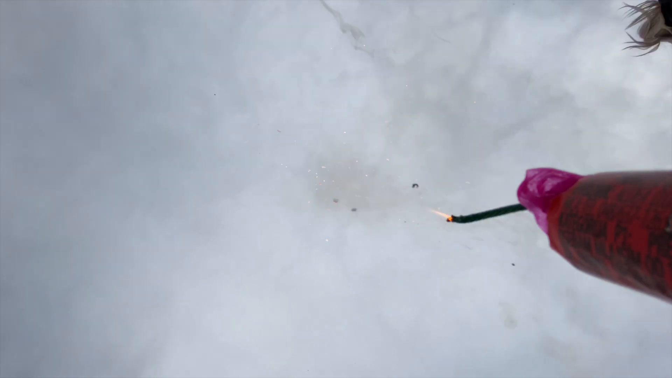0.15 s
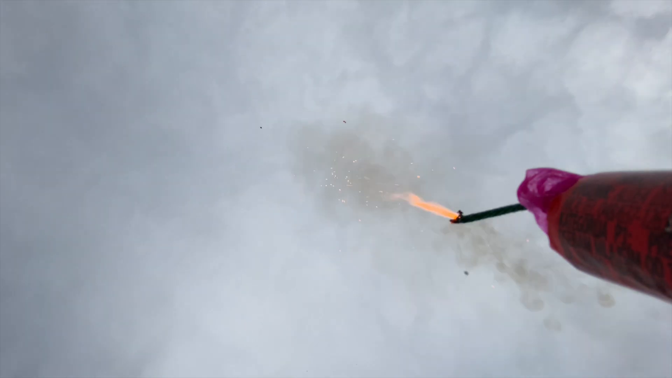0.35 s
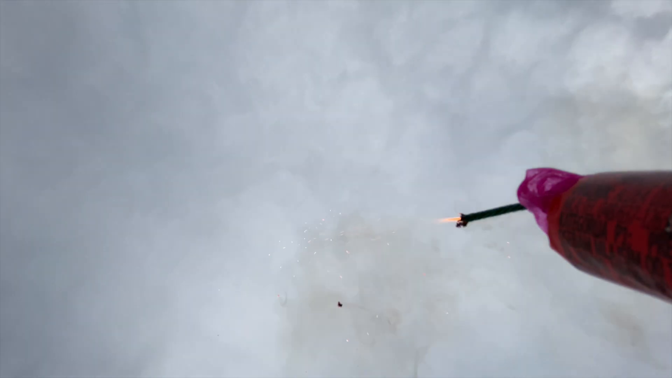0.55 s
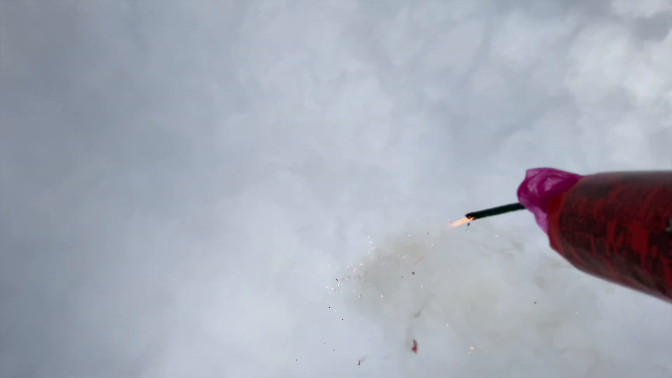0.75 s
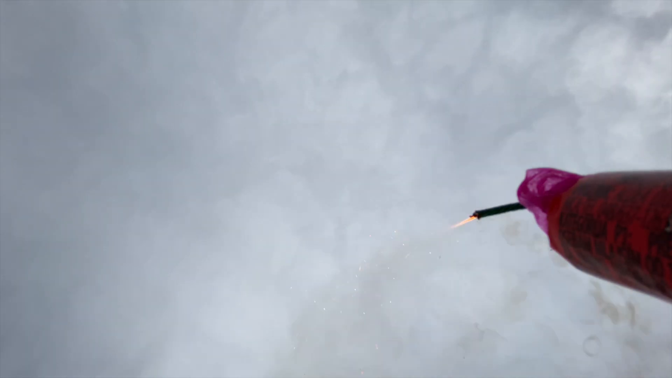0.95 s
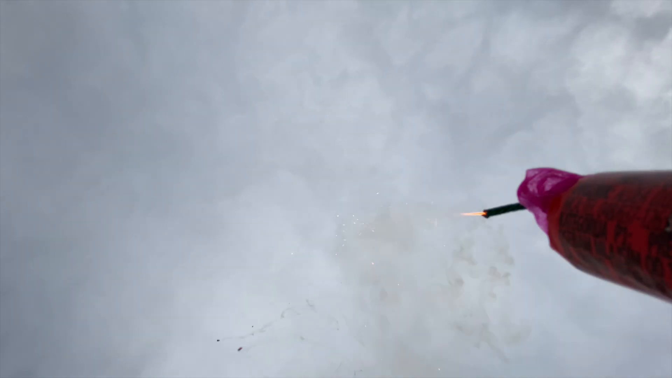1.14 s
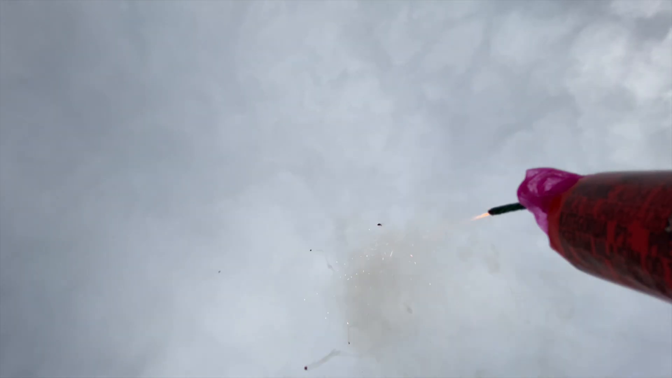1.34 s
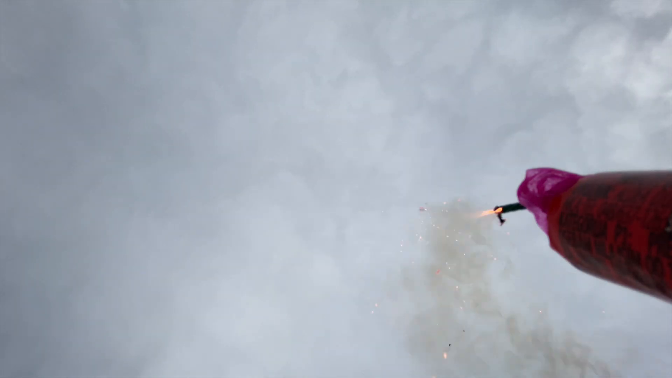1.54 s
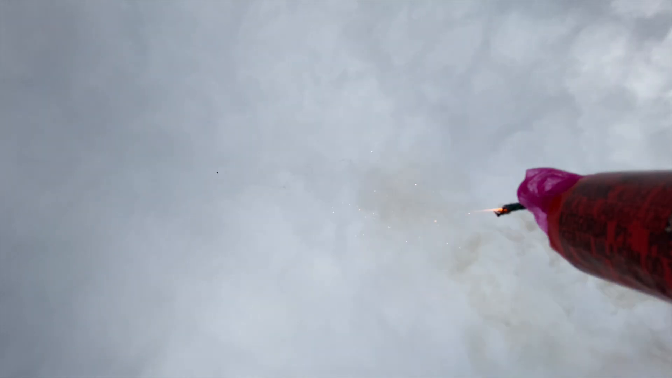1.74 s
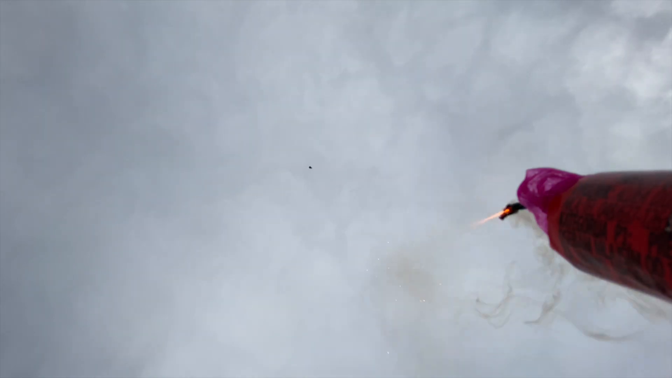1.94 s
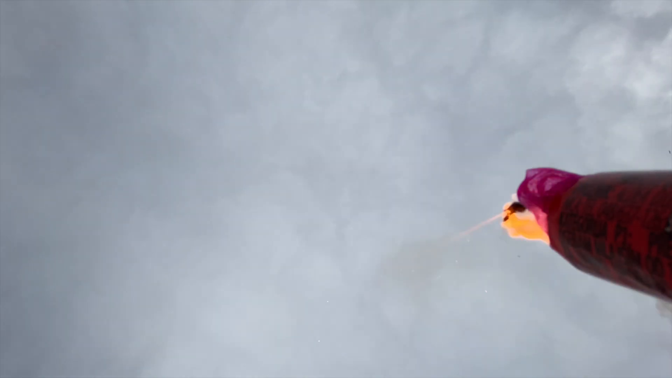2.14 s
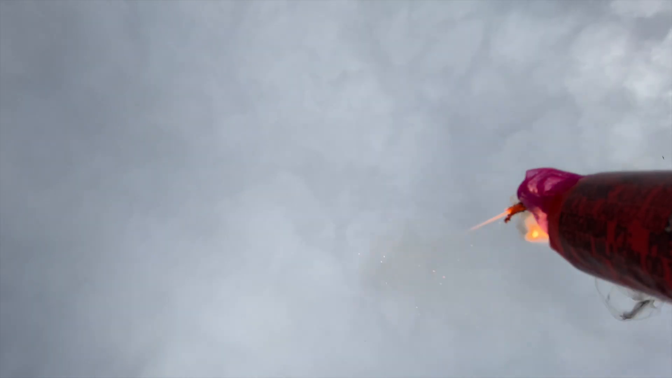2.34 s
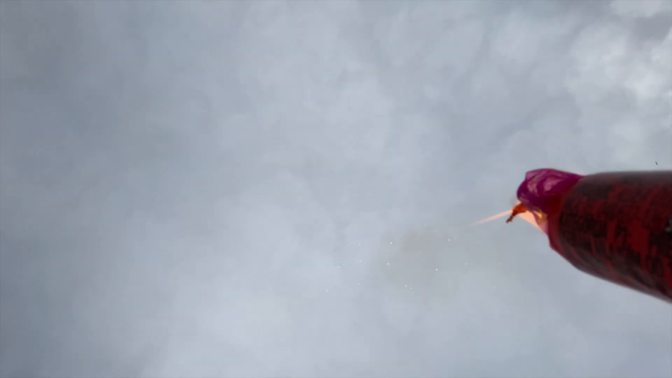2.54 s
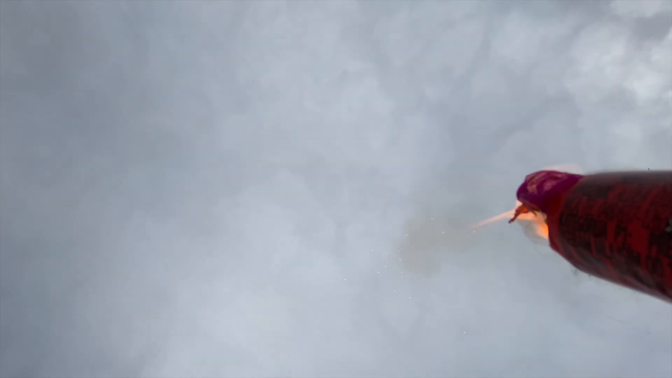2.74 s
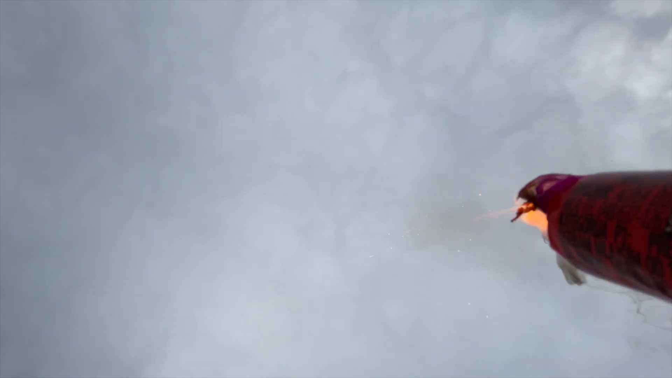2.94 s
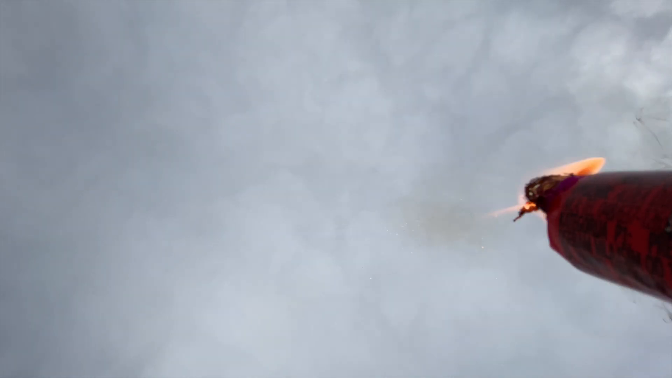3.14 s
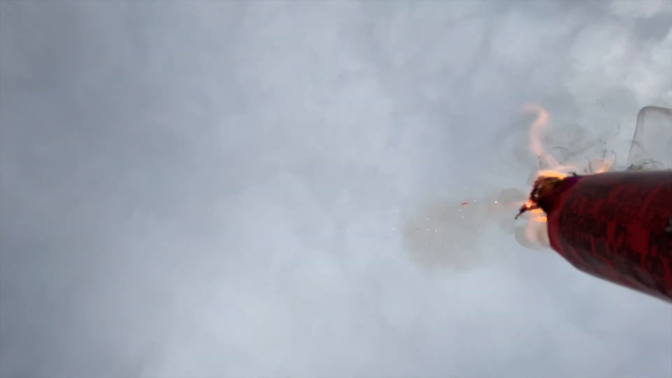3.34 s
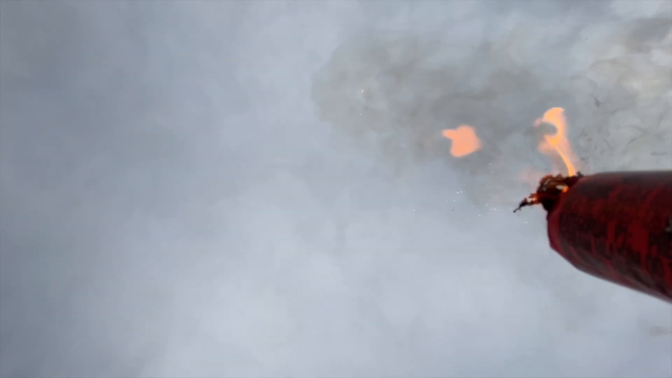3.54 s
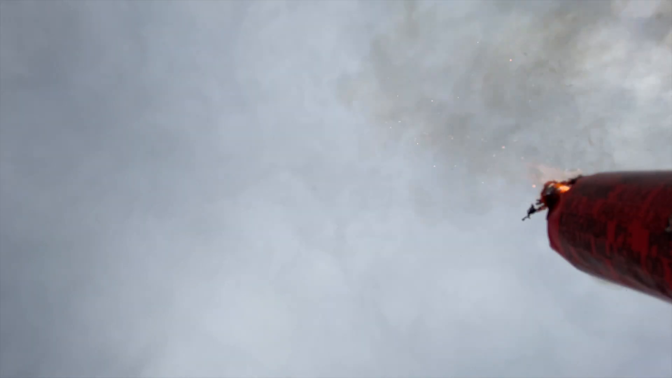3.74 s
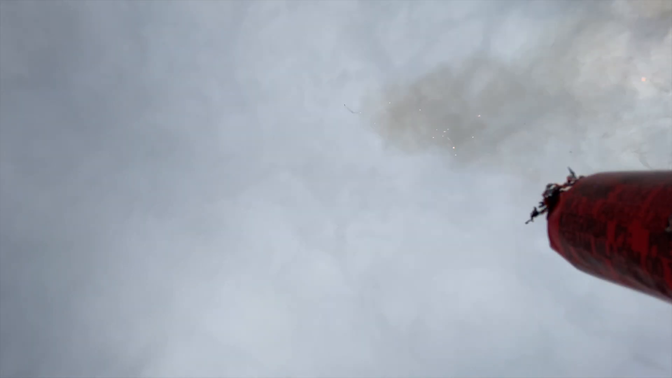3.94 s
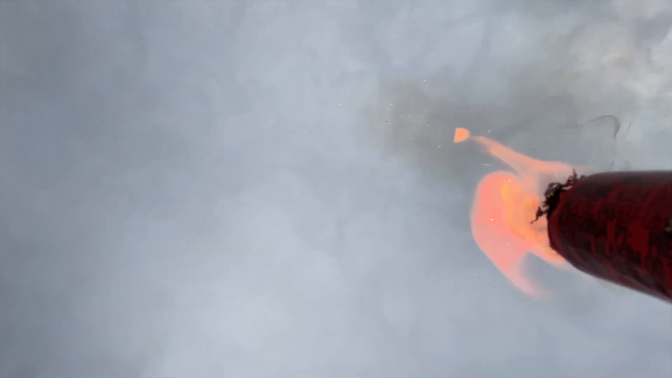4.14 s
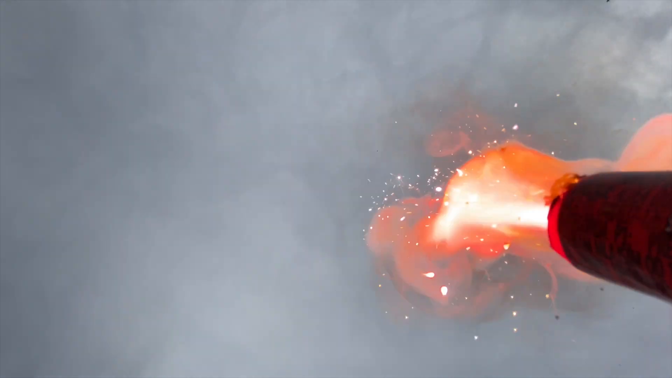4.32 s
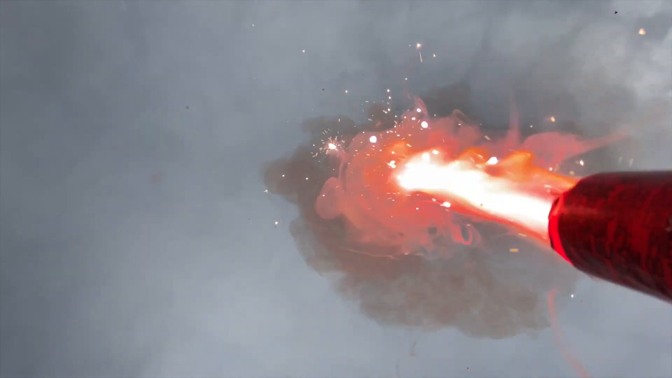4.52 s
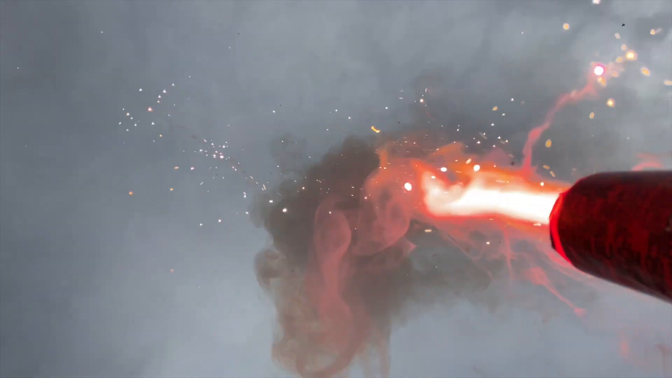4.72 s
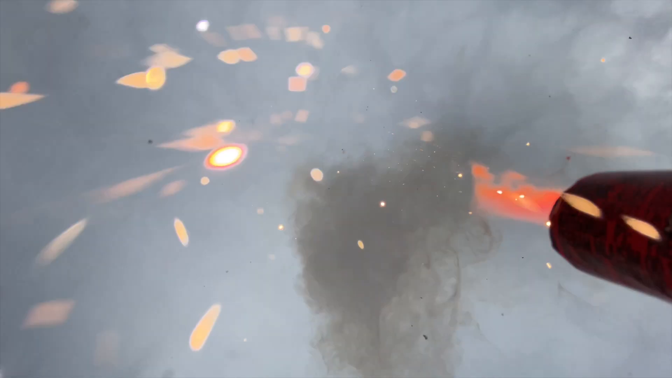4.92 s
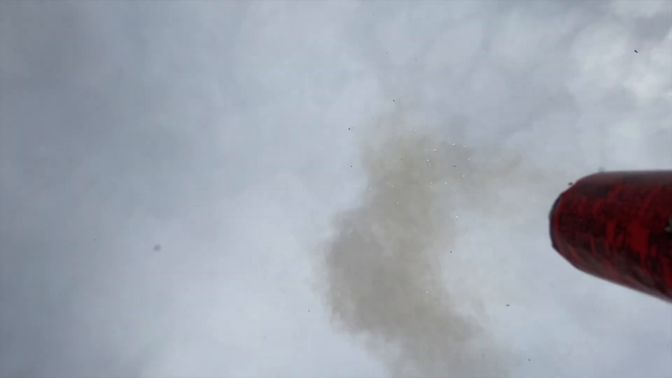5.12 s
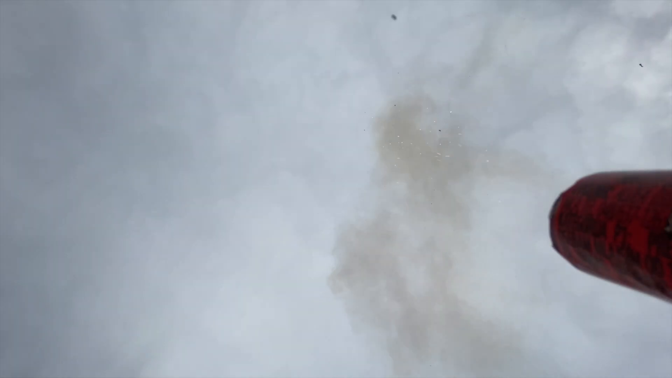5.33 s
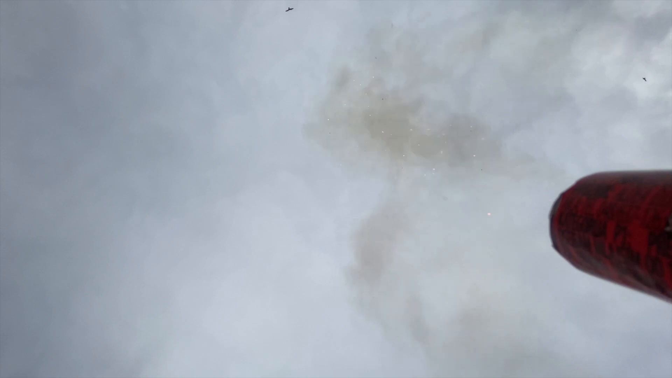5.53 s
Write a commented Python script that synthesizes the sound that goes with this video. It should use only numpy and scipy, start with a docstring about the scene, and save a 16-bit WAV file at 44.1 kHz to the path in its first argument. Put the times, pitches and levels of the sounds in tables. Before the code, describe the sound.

Close, dry stereo of burning powder: sputtering sizzle with small spits and occasional pops, over a faint low hum. The hiss sinks into the tube, then the priming ignites with a deep airy thump at mid-length. A short lull of fizzing leads into a loud, lumpy roaring jet lasting over half a second, cut off by a sharp rattle of clicks, then steady soft hissing.

```python
"""A firework's burning powder hisses and sputters close by: bright noise and tiny clicks on an uneven gas flow,
which also rings the tube as noise in broad resonances. The fuse burns into a paper cap, the priming catches
with a whoomp of noise puffs, gliding swells and ringing air modes, and a flame of lumpy noise roars in a jet.
The jet ends in a rattle of filtered clicks and the tube goes on hissing. Low noise and a faint hum rumble below.
"""
import sys
import numpy as np
from scipy import signal
from scipy.fft import rfft, irfft, next_fast_len
from scipy.io import wavfile
from scipy.ndimage import map_coordinates

SR = 44100
rng = np.random.default_rng(int(sys.argv[2]) if len(sys.argv) > 2 else 0)


def pcm_store(signal):
    """Save signal as 16-bit PCM."""
    levels = np.round(np.clip(np.atleast_2d(signal), -1, 1) * 32767)
    wavfile.write(sys.argv[1], SR, levels.astype(np.int16).T)


N = 245901
TIME = np.arange(N) / SR
FFT_SIZE = 2 * next_fast_len(N // 2 + 1)
HZ = np.maximum(np.arange(FFT_SIZE // 2 + 1) * SR / FFT_SIZE, 1)

# The fuse burns unevenly, sinks under the paper cap and flares at the priming:
# (time [s], gas flow [dB], flame roar [dB])
FUSE_BURN = [(0.04, -38, -41.5), (0.17, -36.8, -40), (0.29, -35, -38.5), (0.32, -40.5, -38.3),
             (0.47, -41.2, -39.5), (0.5, -36, -39.3), (0.61, -34, -39.3), (0.78, -35.6, -39.5),
             (0.87, -33.2, -39.7), (0.92, -36.3, -40), (1.0, -34.3, -40), (1.12, -34.5, -39.8),
             (1.18, -36.3, -40.5), (1.24, -33.2, -40.5), (1.31, -34.5, -37.5), (1.43, -33.3, -39.5),
             (1.56, -34.3, -41), (1.59, -37.6, -40), (2.25, -38.2, -39), (2.43, -37.5, -38.5),
             (2.54, -42, -40.2), (2.68, -40.8, -40.2), (2.95, -44.3, -41), (3.36, -42, -39.5),
             (3.41, -36.3, -37.3), (3.52, -35.8, -37), (3.62, -44, -41), (3.76, -42, -40.5),
             (3.86, -38.6, -39.3), (3.98, -37.6, -39.8)]
# The charge lights, shoots its jet of flame and settles to a hiss: (time [s], gas flow [dB], flame roar [dB])
CHARGE_BURN = [(4.12, -42.5, -39.5), (4.26, -38.2, -38.3), (4.37, -29.5, -31), (4.5, -31.5, -31),
               (4.545, -29.6, -31), (4.575, -28.8, -26.5), (4.69, -28.5, -25.5), (4.745, -25.8, -24.2),
               (4.84, -31.8, -27), (4.9, -30.8, -26.2), (4.972, -27.7, -27), (4.985, -38, -29.5),
               (5.03, -38, -37.5), (5.16, -38.5, -37.5), (5.23, -35.5, -36.5), (5.58, -35.4, -38.7)]
# Richer spots of powder make the fuse spurt: (time [s], extra gas flow [dB], length [s])
POWDER_SPURTS = [(0.415, 5, .025), (0.705, 2, .025), (1.08, 2.6, .06), (1.385, 3, .06), (1.475, 2, .03),
                 (1.617, 3, .02), (1.668, 3, .025), (1.77, 2.5, .05), (1.92, 2, .04), (2.34, 2.8, .05),
                 (2.67, 2.2, .05), (2.725, 3, .025), (2.843, 4.5, .02), (3.29, 4, .04)]
# The fire retreats from the open fuse into the tube: (time [s], depth [0-1])
FIRE_DEPTH = [(1.3, 0), (2.3, .3), (2.75, .36), (3.3, .6), (4.15, .52), (4.4, .84), (5.2, 1)]
MOUTH_DEPTH = .65  # from this depth on, the sizzle comes wholly from inside
USUAL_FLOW_DB = -36

# Colour of the sizzle in the open: (frequency [Hz], density [dB per Hz])
OPEN_SIZZLE_SPECTRUM = [(500, -12), (1600, 1), (2400, -3.7), (2750, 5.3), (3300, 1.3), (3850, -4),
                        (4600, 0), (5100, -1.3), (6800, 1), (7700, -4), (9400, .5), (10800, 0),
                        (11900, -2.5), (14000, -1.5), (16000, -6)]
# Colour of the sizzle inside the tube: (frequency [Hz], density [dB per Hz])
TUBE_SIZZLE_SPECTRUM = [(500, -10), (1400, 1), (2100, -.5), (2450, -6), (2800, -1.5), (3350, 0),
                        (3950, -2.7), (5000, -1.2), (7000, 0), (8200, .3), (9600, .8), (12300, -2.8),
                        (14300, -1.3), (16000, -5.5)]
# Inside the tube a faster jet is brighter: extra dB of treble per dB of flow
TREBLE_DB_PER_DB, TREBLE_HZ = .17, 9000

# Lower resonances in the escaping gas: (frequency [Hz], width [Hz], level [dB])
HOLLOW_RESONANCES = [(1745, 334, -9.5), (2055, 255, -.4), (2790, 220, -11), (3400, 330, -2.8),
                     (4480, 286, -10.5)]
# Upper resonances in the escaping gas: (frequency [Hz], width [Hz], level [dB])
UPPER_RESONANCES = [(5800, 600, 0), (6230, 560, -1.5)]
# How the hollow ring follows the gas: (at the usual flow [dB], slope [dB per dB of flow], gain at full depth [dB])
HOLLOW_FOLLOW = (-39.3, .8, 5.3)
# How the upper ring follows the gas: (at the usual flow [dB], slope [dB per dB of flow], gain at full depth [dB])
UPPER_FOLLOW = (-48.6, .58, 13.6)
HOLLOW_REST_DB = -47  # the hollow ring that stays when the flow is weak

# Flame in the paper cap, which catches and burns away: (time [s], level [dB])
CAP_LEVEL = [(2.1, -60), (2.28, -40), (2.5, -39.5), (2.9, -43), (3.45, -42), (3.6, -60)]
# Broad resonances around the burning cap: (frequency [Hz], width [Hz], level [dB])
CAP_RESONANCES = [(2050, 280, 0), (2900, 850, -4.5), (5400, 1600, -11.5)]

# Colour of the flame's roar: (frequency [Hz], density [dB per Hz])
ROAR_SPECTRUM = [(30, -26), (70, -7), (130, -.2), (210, -1.5), (360, .6), (480, -.4), (640, .3),
                 (1100, -.5), (1550, -2.8), (2000, -8), (2600, -24), (5000, -38)]

# Pockets of gas catching fire:
# (time [s], strength [dB], low edge [Hz], high edge [Hz], length [share of a full puff])
GAS_PUFFS = [(2.869, -11, 200, 300, .3), (3.437, -14, 70, 600, 1.0), (3.4805, 3, 560, 1150, .5),
             (3.481, -4.5, 1500, 5000, .6), (3.491, 1, 450, 5500, .4), (3.491, 3.5, 1200, 2300, .4),
             (3.495, -2, 25, 480, 1.15), (3.513, -2, 480, 950, 1.25), (3.514, 1, 200, 400, .85),
             (3.5155, 2.3, 2300, 7500, 1.0), (3.543, -8, 2500, 7000, .8), (3.675, -15, 25, 110, .5),
             (4.33, -18, 100, 300, 3), (4.548, -6.5, 300, 800, .6), (4.567, -3.5, 55, 900, .55),
             (4.596, -9, 100, 600, .4), (4.623, 2, 750, 1800, .85), (4.626, -9, 200, 550, .6),
             (4.713, 3, 1700, 2200, 1.2), (4.755, -5, 330, 1400, .7), (4.787, -.5, 300, 520, .6),
             (4.872, -5, 650, 1250, 1.1), (4.893, -10, 150, 520, .5), (4.942, -10, 200, 500, .45)]
# Colour of a full puff: (frequency [Hz], level [dB per half octave])
PUFF_COLOUR = [(30, -32), (70, -26), (150, -22), (320, -22.5), (650, -24), (1050, -28), (1500, -33.5),
               (2100, -31), (2950, -20), (4200, -32.5), (6000, -25.5)]
PUFF_HZ, PUFF_RISE_S, PUFF_T60_S = 200, .003, .42  # rise and decay at this frequency
PUFF_RISE_SLOPE, PUFF_T60_SLOPE = .35, .42  # both shorten by these powers of frequency

# Swells of pressure as a flame leaps up or goes out:
# (time [s], strength [dB], first pitch [Hz], last pitch [Hz], time to peak [s])
PRESSURE_SWELLS = [(2.867, -30, 190, 205, .011), (3.496, -13, 185, 160, .003),
                   (3.4975, -12, 81.6, 55.1, .0245), (4.975, -28, 89, 60, 0.0095)]
# Modes of the air in the tube, rung by the whoomp: (frequency [Hz], level [dB], t60 [s])
COLUMN_MODES = [(88, -26, .36), (130, -24, .33), (176, -22.5, .4), (305, -19, .33), (456, -32, .26),
                (562, -30, .27), (673, -23.5, .25), (775, -34, .25)]
COLUMN_START_S, COLUMN_RISE_S = 3.497, .008

# The loudest popping grains of powder: (time [s], strength before colouring [dB])
LOUD_POPS = [(0.635, -16.6), (1.0863, -14.4), (1.6692, -17), (1.794, -16), (3.4582, -15), (4.3781, -11.3),
             (4.4004, -10.3), (4.9474, -6), (4.9605, -8), (4.9707, -3.2), (4.9733, -3.3), (4.9775, -6.7)]
# Colour of a pop: (frequency [Hz], level [dB])
POP_COLOUR = [(200, -12), (1500, -3), (5000, -2), (10000, 0), (16000, -1)]
STRAY_POPS_PER_S, STRAY_OVER_FLOW_DB = 2, 17  # lesser pops come at random
# The jet ends in a rattle of pops that swells up to its last moment
RATTLE_END_S, RATTLE_S, RATTLE_PER_S = 4.978, .045, 260
RATTLE_DB, RATTLE_SWELL_DB, POP_SPREAD_DB = -8, 3, 1.5

# Low rumble of the air around the flame: (time [s], level [dB])
RUMBLE_LEVEL = [(0.04, -53), (1.1, -54), (1.55, -50), (1.77, -44), (1.9, -48), (2.55, -52), (2.78, -52),
                (2.86, -44.5), (3.0, -45), (3.12, -50), (3.4, -44), (3.62, -38.5), (3.8, -43.5),
                (4.1, -46.5), (4.22, -55), (4.35, -41.5), (4.98, -42.5), (5.1, -50)]
# Colour of the rumbling air: (frequency [Hz], density [dB per Hz])
AIR_SPECTRUM = [(15, -25.5), (40, -17.5), (55, -4), (66, 2.5), (85, -3.5), (110, -12), (200, -31.5)]
HUM_HZ, HUM_WANDER_HZ, HUM_SHARE = 72, 4, .35  # the share is of the rumble's power

# The stereo pair of left and right:
# (frequency [Hz], likeness [0-1], lead of the left [radians], left minus right [dB])
STEREO_PAIR = [(101, 0.99, 0, 0.5), (251, 1, -0.0936, 0.53), (654, 0.93, -0.4549, 1.56), (1396, 1, 0, -0.5),
               (2187, 1, 0, 0), (2880, 0.91, -0.5, -5), (3580, 1, 0.4426, 0), (4280, 0.49, 0.75, -4.5),
               (5420, 0.83, 0.6167, 2), (6630, 0.73, 1.2184, -5), (8424, 1, 3.05, 0), (11570, 1, 3.2, 0.2),
               (13465, 0.33, 5, -0.5), (15800, 0.67, 5.5, 1.5)]
START_S, CUTOFF_HZ = 0.03255, 15750


def sizzle(level_db, inside, shimmer_db=1.1):
    """Burning powder: a bright jet full of tiny clicks, whose colour changes as it moves into the tube."""
    raw = turbulence() + 0.566 * grains(per_s=2200, spread_db=2.5)
    # each of four bands of the hiss flickers in level by itself
    edges = [0, 4000, 7500, 11500, SR]
    jet = 0
    for low, high in zip(edges, edges[1:]):
        band = filtered(raw, (HZ > low) & (HZ <= high))
        jet = jet + band * from_db(shimmer_db * drift(46))
    in_open = from_db(3.5) * colour(jet, shape(OPEN_SIZZLE_SPECTRUM))
    in_tube = from_db(3.0) * colour(jet, shape(TUBE_SIZZLE_SPECTRUM))
    return from_db(level_db) * ((1 - inside) * in_open + inside * in_tube)


def brightened(hiss, flow_db, inside):
    """Inside the tube, the treble of the hiss grows faster than the flow."""
    treble = filtered(hiss, 1 / (1 + (TREBLE_HZ / HZ) ** 6))
    boost = from_db(TREBLE_DB_PER_DB * inside * (flow_db - USUAL_FLOW_DB))
    return hiss + treble * (boost - 1)


def sputter(per_s, decay_s, depth, flutter_db):
    """Gain of the gas flow: spits that start at once and die away, on a quick flutter."""
    starts = (rng.random(N) < per_s / SR) * rng.uniform(0.38, 1, N)
    spits = decaying(starts, decay_s)
    return rms_one((1 + depth * spits) * from_db(flutter_db * drift(63)))


def spurts():
    """Extra gas flow in dB: each richer spot of powder swells up and fades."""
    return sum(db * np.exp(-(2 * (TIME - s) / length) ** 2) for s, db, length in POWDER_SPURTS)


def tube(flow_db, depth):
    """Escaping gas rings in broad resonances, stronger as the fire sits deeper; the lower ones waver in pitch."""
    gas = turbulence() + .5 * grains(per_s=900, spread_db=3.5)
    driven_hollow = from_db(driven(HOLLOW_FOLLOW, flow_db, depth))
    hollow_level = np.sqrt(driven_hollow ** 2 + from_db(HOLLOW_REST_DB) ** 2)
    upper_level = from_db(driven(UPPER_FOLLOW, flow_db, depth))
    hollow = wavering(colour(gas, resonances(HOLLOW_RESONANCES)), share=.01, rate_hz=14)
    upper = colour(gas, resonances(UPPER_RESONANCES))
    return hollow_level * hollow + upper_level * upper


def driven(law, flow_db, depth):
    """Level in dB of a ring that follows the gas flow and the depth of the fire."""
    usual_db, slope, depth_db = law
    return usual_db + slope * (flow_db - USUAL_FLOW_DB) + depth_db * depth


def cap():
    """The flame in the paper cap is noise in the broad resonances of the mouth of the tube."""
    return from_db(in_time(CAP_LEVEL)[0]) * colour(turbulence(), resonances(CAP_RESONANCES))


def flame(level_db, full_db=-26, deep_hz=650, gust_db=.6):
    """The flame's lumpy roar; the bigger the flame, the deeper and gustier it is."""
    gas = turbulence() + .5 * grains(per_s=500, spread_db=3.0)
    size = np.clip(from_db(level_db - full_db), 0, 1)
    spectrum = shape(ROAR_SPECTRUM)
    plain = colour(gas, spectrum)
    deep = colour(gas, spectrum / (1 + (HZ / deep_hz) ** 2))
    roar = (1 - .5 * size) * plain + .5 * size * deep  # the low eddies grow with the flame
    lumps_db = 1.2 * drift(28) + gust_db * size * drift(12)
    return from_db(level_db + lumps_db) * roar


def puffs(ragged_db=.8):
    """Pockets of gas flare up quickly and die away a little raggedly; their lows rise slower and last longer."""
    out, age = np.zeros((2, N)), TIME[:SR]
    noises = turbulence(), turbulence()  # neighbouring bands take turns
    colour_hz, colour_db = np.transpose(PUFF_COLOUR)
    edges = np.geomspace(19, 7200, 18)
    for k, (low, high) in enumerate(zip(edges, edges[1:])):
        hz = np.sqrt(low * high)
        rise = PUFF_RISE_S * (PUFF_HZ / hz) ** PUFF_RISE_SLOPE
        t60 = PUFF_T60_S * (PUFF_HZ / hz) ** PUFF_T60_SLOPE
        power = np.zeros(N + SR)
        for s, db, low_hz, high_hz, length in GAS_PUFFS:
            start = round(s * SR)
            flare = (1 - np.exp(-age / rise)) * from_db(db - 60 * age / (t60 * length))
            outside_edges = (low_hz / hz) ** 10 + (hz / high_hz) ** 10
            power[start:start + SR] += flare ** 2 / (1 + outside_edges)
        band_db = np.interp(np.log(hz), np.log(colour_hz), colour_db)
        bandpass = signal.butter(2, [low, high], "band", fs=SR, output="sos")
        band = rms_one(signal.sosfilt(bandpass, noises[k % 2]))
        out += from_db(band_db + ragged_db * drift(70)) * np.sqrt(power[:N]) * band
    return out


def thumps(second=.33, third=.12, strong_db=-11.5):
    """A few swings of pressure that glide in pitch, mostly down; the stronger, the sharper their troughs."""
    out = np.zeros(N)
    for s, db, first_hz, last_hz, peak_s in PRESSURE_SWELLS:
        age = np.maximum(TIME - s, 0)
        pitch = last_hz + (first_hz - last_hz) * np.exp(-age / .045)
        phase = 2 * np.pi * np.cumsum((age > 0) * pitch) / SR
        swell = from_db(db) * (age / peak_s * np.exp(1 - age / peak_s)) ** 1.45
        sharp = np.sqrt(swell / from_db(strong_db))
        overtones = second * np.cos(2 * phase) + third * np.cos(3 * phase)
        out -= swell * (np.cos(phase) + sharp * overtones)
    return shared_only(out)


def column():
    """The whoomp sets the air in the tube ringing in modes that die away."""
    age = np.maximum(TIME - COLUMN_START_S, 0)
    ring = sum(from_db(db - 60 * age / t60) * np.sin(2 * np.pi * hz * age) for hz, db, t60 in COLUMN_MODES)
    return shared_only((1 - np.exp(-age / COLUMN_RISE_S)) * ring)


def pops(flow_db, fizz=.1, fizz_s=.0006):
    """Each grain bursts with one sharp crack, shared by both sides, and a moment of fizz."""
    clicks = shared_only(bursts(flow_db))
    tails = decaying(clicks[0], fizz_s)
    return from_db(6.0) * filtered(clicks + fizz * tails * turbulence(), shape(POP_COLOUR))


def bursts(flow_db):
    """When and how hard grains burst: the loudest ones, strays that follow the flow, and the closing rattle."""
    chance = rng.random(N)
    size = from_db(POP_SPREAD_DB * rng.standard_normal(N))
    to_go = np.clip((RATTLE_END_S - TIME) / RATTLE_S, 0, 1)  # falls from 1 to 0 during the rattle
    in_rattle = (to_go > 0) & (to_go < 1)
    strays = (chance < STRAY_POPS_PER_S / SR) * from_db(flow_db + STRAY_OVER_FLOW_DB)
    rattle = (chance < RATTLE_PER_S / SR) * in_rattle * from_db(RATTLE_DB - RATTLE_SWELL_DB * to_go)
    clicks = size * (strays + rattle)
    for s, db in LOUD_POPS:
        clicks[round(s * SR)] += from_db(db)
    return clicks


def rumble(waver_db=1.5):
    """The air rumbles low around the flame as dark noise, and the air column in the tube hums beneath it,
    wavering in pitch and level."""
    hum_hz = HUM_HZ + HUM_WANDER_HZ * drift(4)
    hum = np.sin(2 * np.pi * np.cumsum(hum_hz) / SR)
    hum = shared_only(rms_one(from_db(waver_db * drift(5)) * hum))
    air = colour(turbulence(), shape(AIR_SPECTRUM))
    return from_db(in_time(RUMBLE_LEVEL)[0]) * (np.sqrt(1 - HUM_SHARE) * air + np.sqrt(HUM_SHARE) * hum)


def turbulence():
    """Two unrelated noises: the part that both sides share and the part in which they differ."""
    return rng.standard_normal((2, N))


def grains(per_s, spread_db):
    """Tiny clicks of burning powder, mostly small and a few large."""
    born = rng.random(N) < per_s / SR
    sizes = from_db(spread_db * np.minimum(rng.exponential(1, N), 4))
    return rms_one(born * sizes * rng.choice([-1, 1], (2, N)))


def drift(rate_hz):
    """Slow random wander with spread 1, made at every 20th sample."""
    r = np.exp(-40 * np.pi * rate_hz / SR)
    noise = rng.standard_normal(N // 20 + 4002)
    slow = signal.lfilter([1], [1, -2 * r, r * r], noise)[4000:]  # skip the filter's start
    return np.interp(np.arange(N) / 20, np.arange(len(slow)), rms_one(slow))


def wavering(x, share, rate_hz):
    """Let the pitch of a sound wander by a small share, by reading it at an uneven pace."""
    at = np.arange(N)
    return np.array([map_coordinates(side, [at + np.cumsum(share * drift(rate_hz))], order=3, mode="mirror")
                     for side in x])


def decaying(clicks, decay_s):
    """Give each click an exponential tail."""
    return signal.lfilter([1], [1, -np.exp(-1 / (decay_s * SR))], clicks + 1e-18)


def shared_only(x):
    """A sound with a shared part and no differing part."""
    return np.array([x, np.zeros(N)])


def from_db(db):
    """Decibels to gain."""
    return 10 ** (np.asarray(db) / 20)


def rms_one(x):
    """Scale to unit power."""
    return x / np.sqrt(np.mean(x ** 2) + 1e-20)


def in_time(rows):
    """Each column of a curve at every sample."""
    s, *columns = np.transpose(rows)
    return [np.interp(TIME, s, c) for c in columns]


def in_frequency(rows):
    """Each column of a spectrum at every frequency."""
    hz, *columns = np.transpose(rows)
    return [np.interp(np.log(HZ), np.log(hz), c) for c in columns]


def filtered(x, gain):
    """Filter by a gain per frequency."""
    return irfft(rfft(x, FFT_SIZE) * gain, FFT_SIZE)[..., :N]


def colour(x, gain):
    """Filter and scale to unit power."""
    return rms_one(filtered(x, gain))


def shape(spectrum):
    """Gain per frequency of a spectrum."""
    return from_db(in_frequency(spectrum)[0])


def resonances(modes):
    """Gain per frequency of a few resonances."""
    return sum(from_db(db) / (1 + ((HZ - hz) / (0.681 * width)) ** 2) for hz, width, db in modes)


def stereo(x):
    """Nearly the same bass on both sides; the treble differs in phase and likeness, giving width."""
    alike, lead, pan_db = in_frequency(STEREO_PAIR)
    shared, differing = filtered(x, np.sqrt([(1 + alike) / 2, (1 - alike) / 2]))
    left = filtered(shared + differing, from_db(pan_db / 2))
    right = filtered(shared - differing, from_db(-pan_db / 2) * np.exp(-1j * lead))
    return np.array([left, right])


def scene():
    """One sputtering gas flow drives sizzle, tube and cap; flame, puffs, pops and rumble come on top."""
    flow_db, roar_db = in_time(FUSE_BURN + CHARGE_BURN)
    flow_db = flow_db + spurts()
    depth, = in_time(FIRE_DEPTH)
    inside = np.clip(depth / MOUTH_DEPTH, 0, 1)
    spitting = sputter(per_s=45, decay_s=0.0075, depth=0.24, flutter_db=0.62)
    hiss = brightened(sizzle(flow_db, inside), flow_db, inside)
    jet = spitting * (hiss + tube(flow_db, depth) + cap())
    whoomp = puffs() + thumps() + column()
    return stereo(jet + flame(roar_db) + whoomp + pops(flow_db) + rumble())


def record(dry):
    """The sound opens within a few milliseconds; the highest peaks are rounded and the top is cut steeply."""
    opened = dry * np.clip((TIME - START_S) / .007, 0, 1)
    rounded = opened / (1 + (opened / .8) ** 4) ** .25
    lowpass = signal.ellip(12, .1, 80, CUTOFF_HZ, fs=SR, output="sos")
    return signal.sosfilt(lowpass, rounded)


dry = scene()
out = record(dry)
pcm_store(out)
```